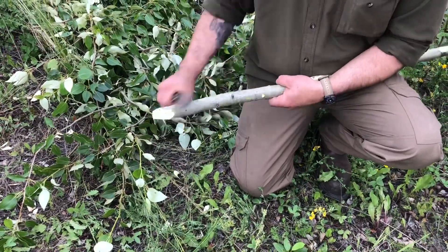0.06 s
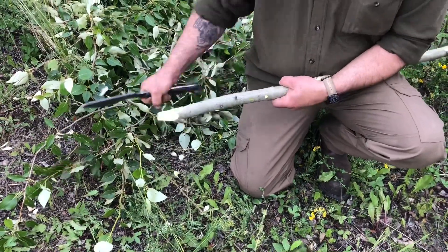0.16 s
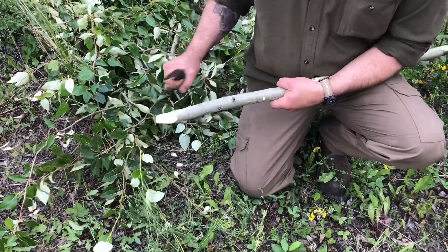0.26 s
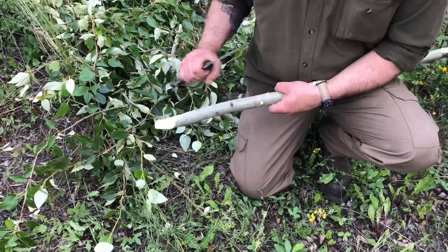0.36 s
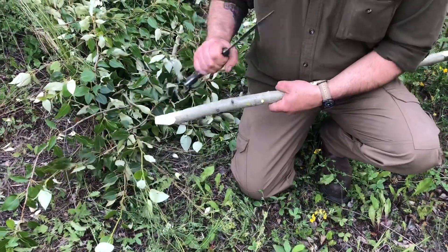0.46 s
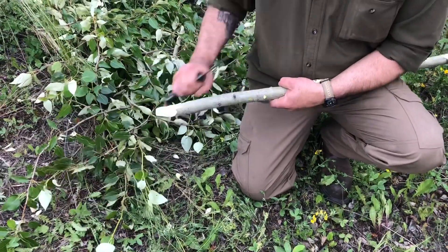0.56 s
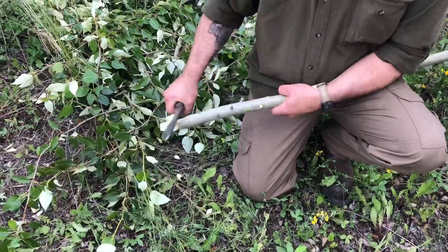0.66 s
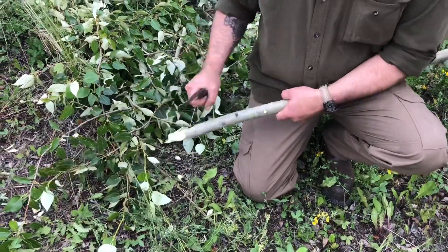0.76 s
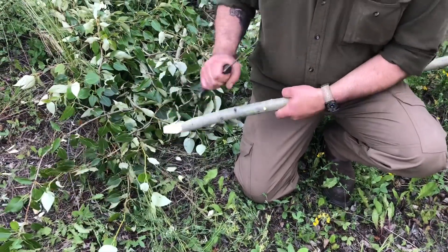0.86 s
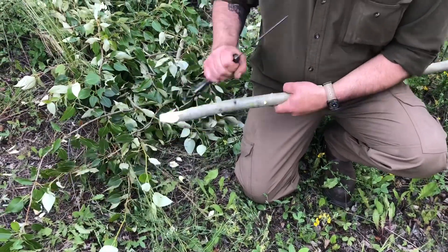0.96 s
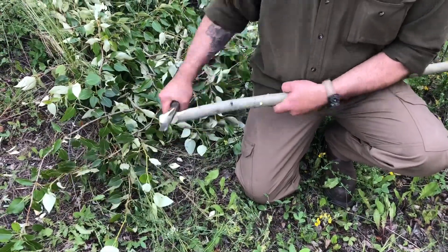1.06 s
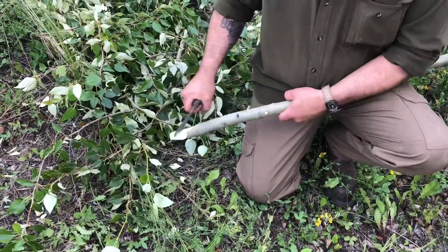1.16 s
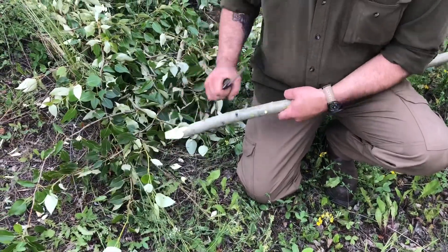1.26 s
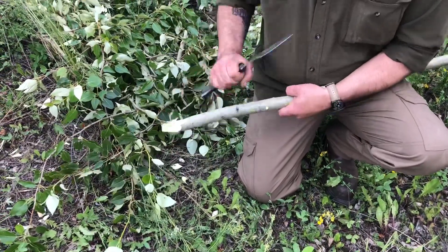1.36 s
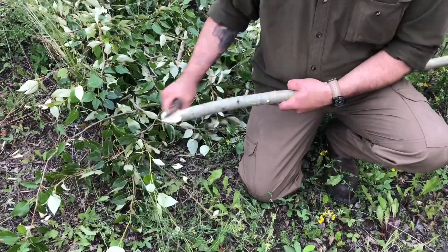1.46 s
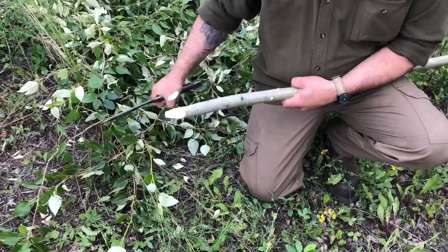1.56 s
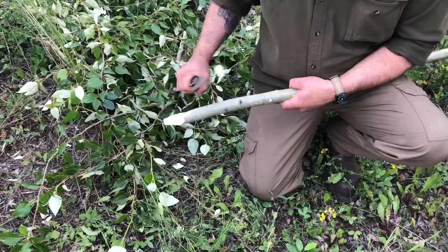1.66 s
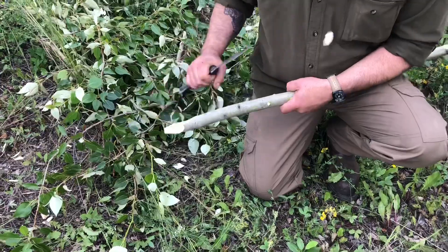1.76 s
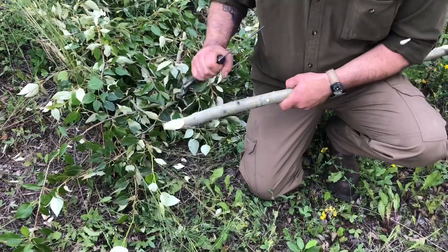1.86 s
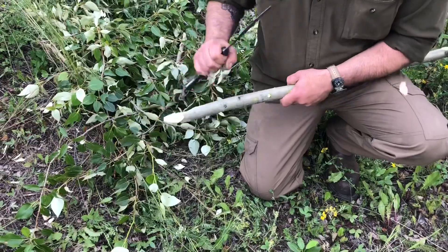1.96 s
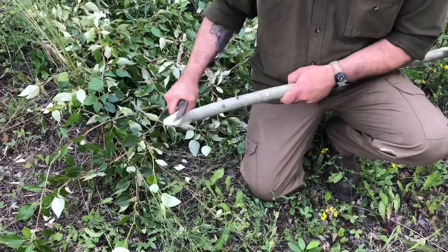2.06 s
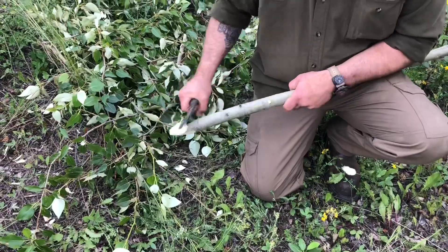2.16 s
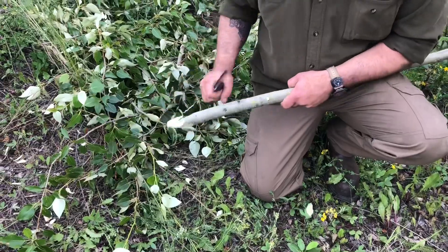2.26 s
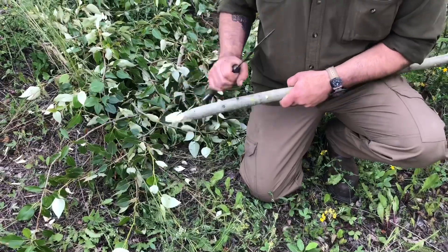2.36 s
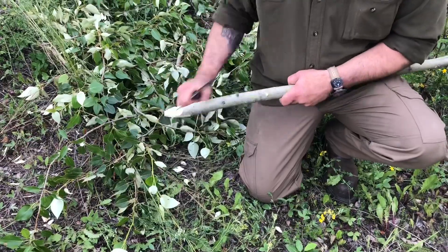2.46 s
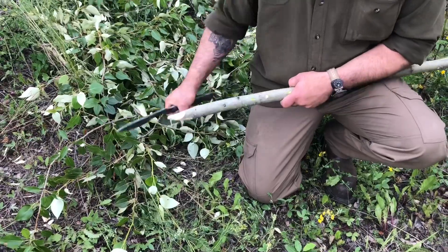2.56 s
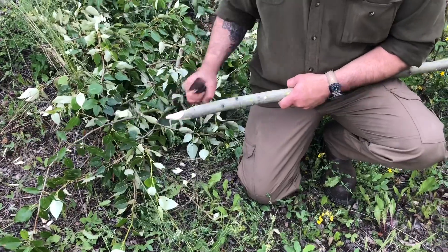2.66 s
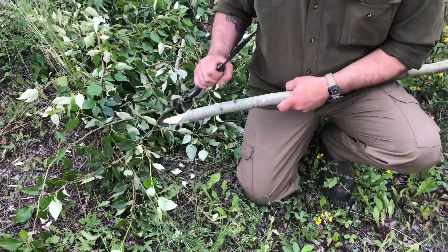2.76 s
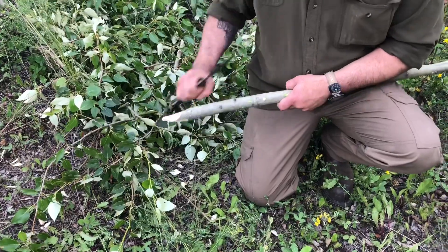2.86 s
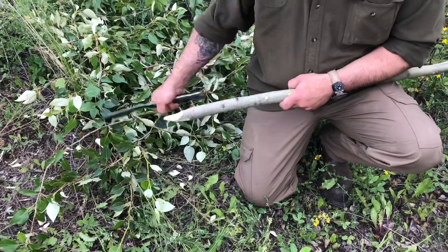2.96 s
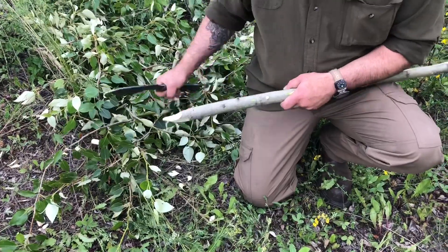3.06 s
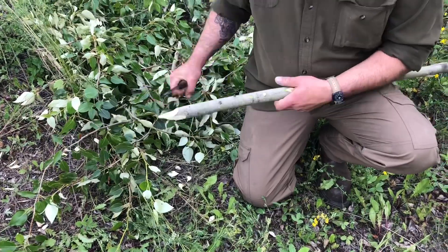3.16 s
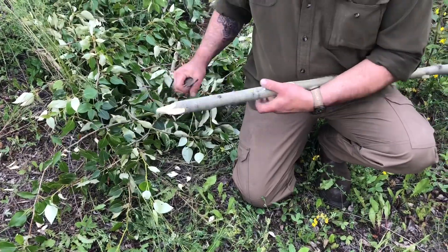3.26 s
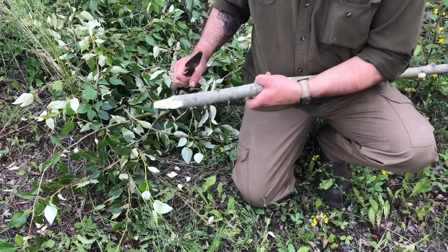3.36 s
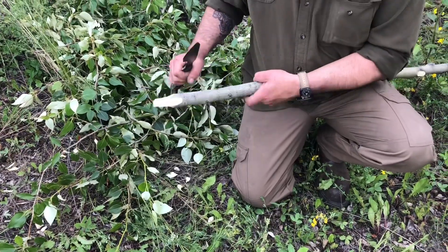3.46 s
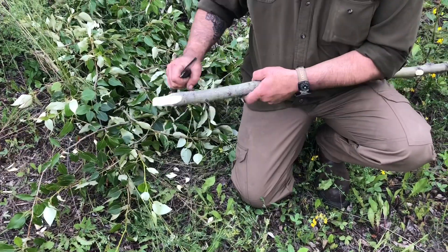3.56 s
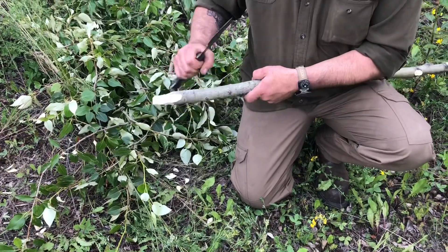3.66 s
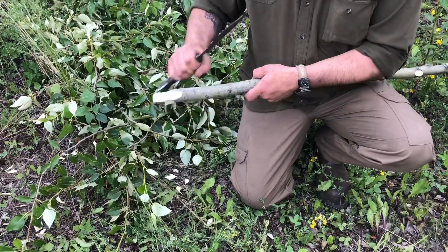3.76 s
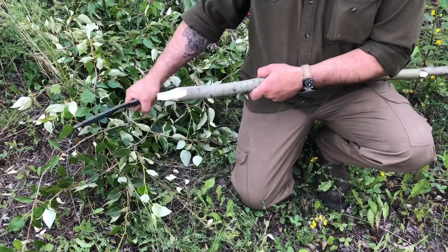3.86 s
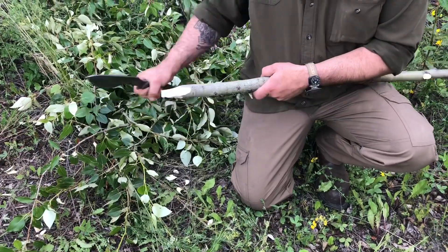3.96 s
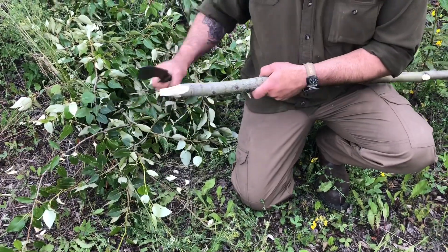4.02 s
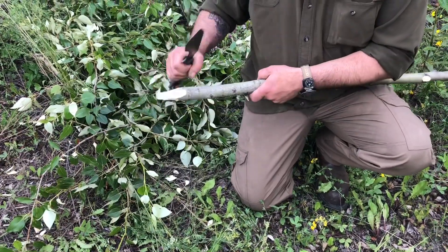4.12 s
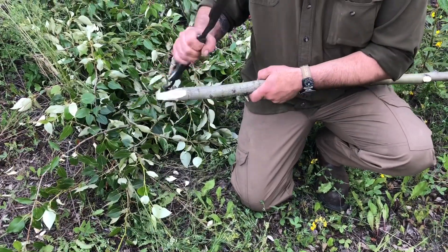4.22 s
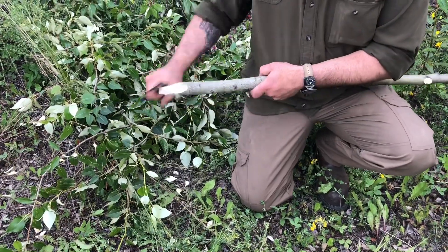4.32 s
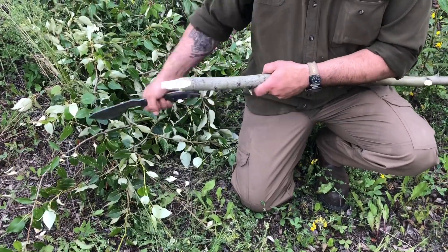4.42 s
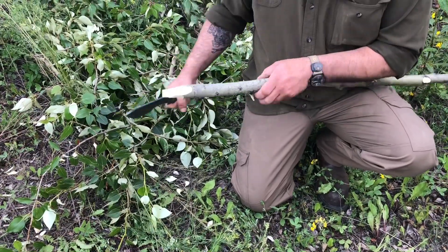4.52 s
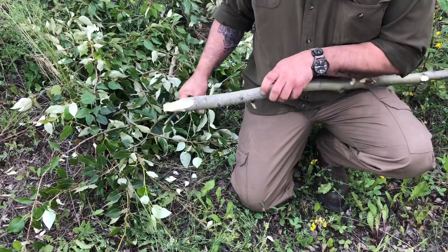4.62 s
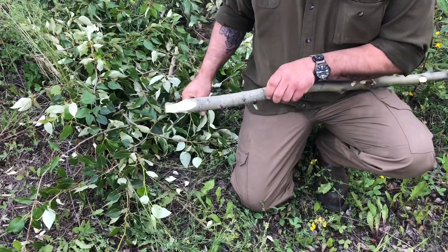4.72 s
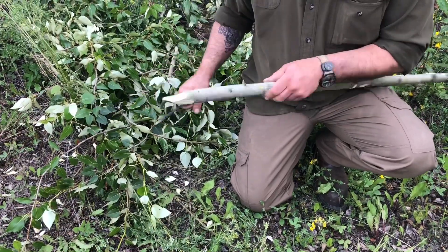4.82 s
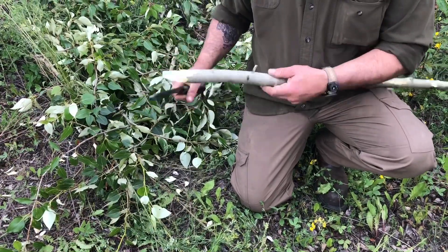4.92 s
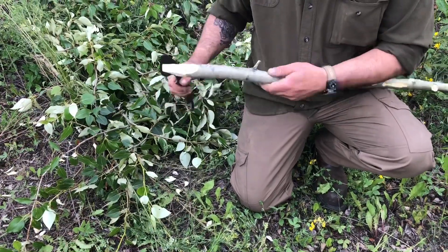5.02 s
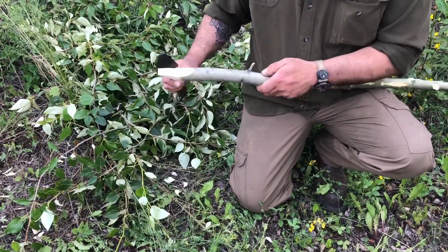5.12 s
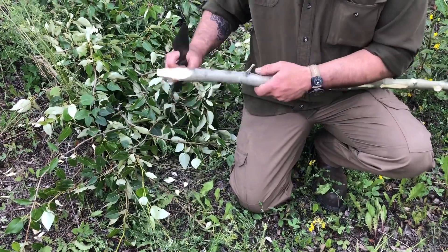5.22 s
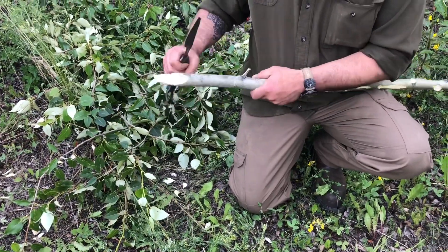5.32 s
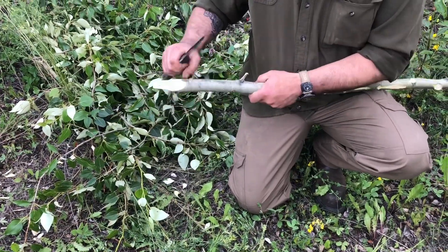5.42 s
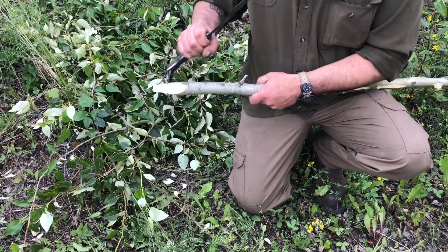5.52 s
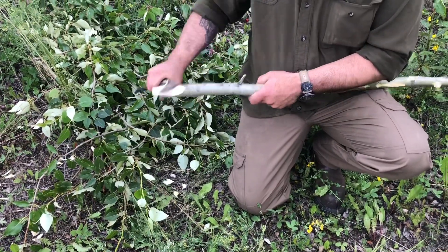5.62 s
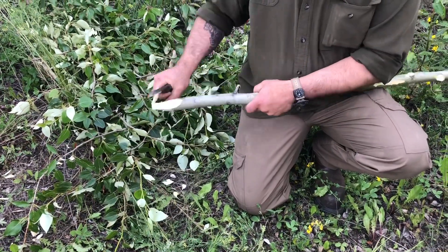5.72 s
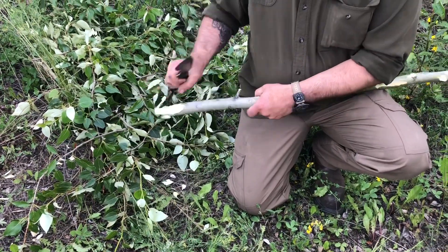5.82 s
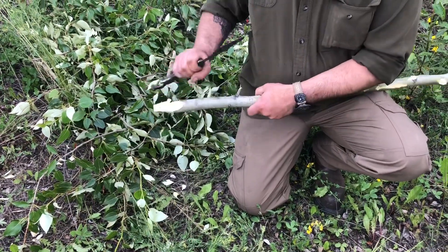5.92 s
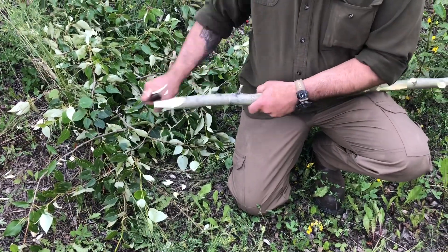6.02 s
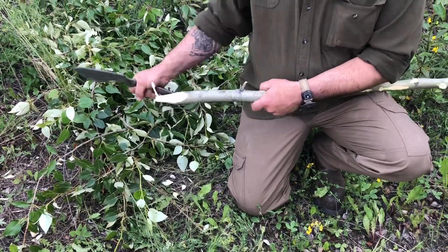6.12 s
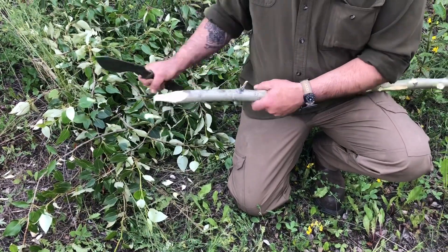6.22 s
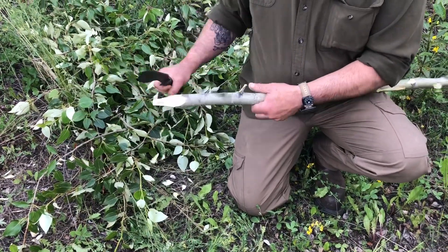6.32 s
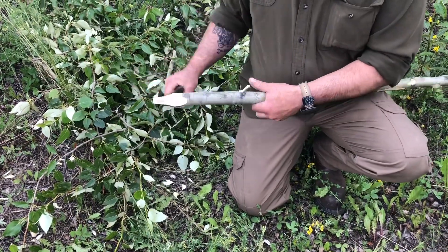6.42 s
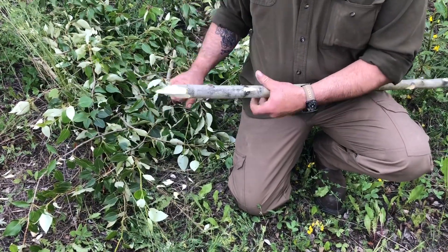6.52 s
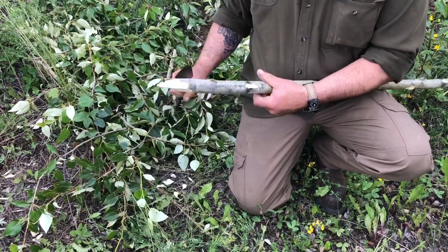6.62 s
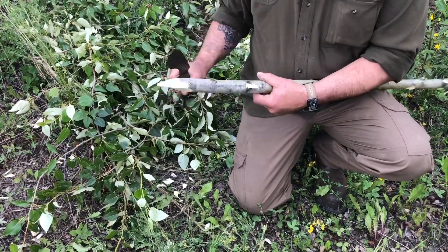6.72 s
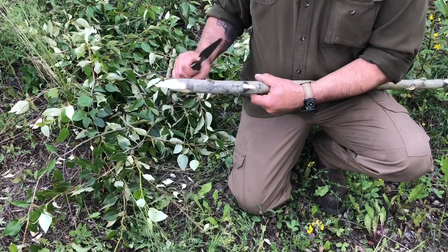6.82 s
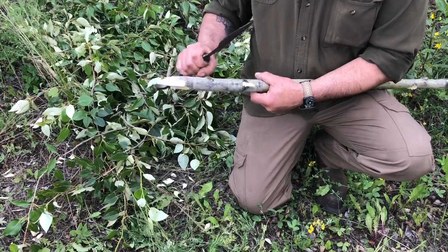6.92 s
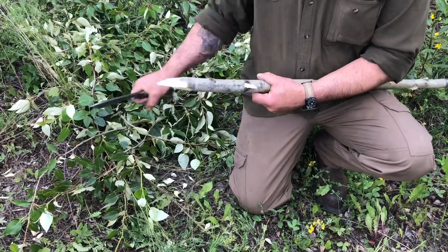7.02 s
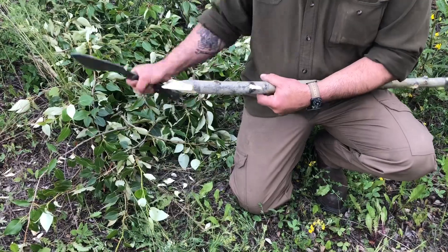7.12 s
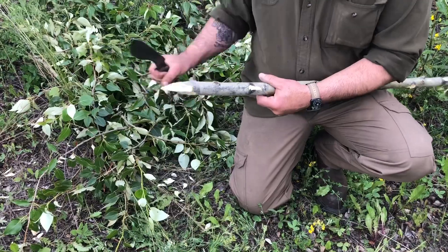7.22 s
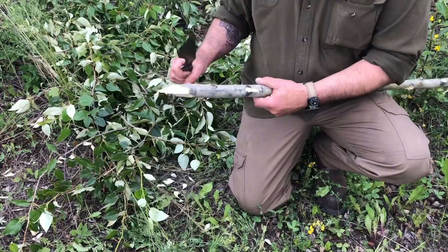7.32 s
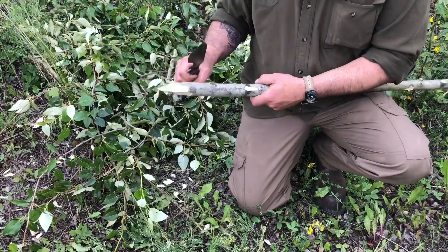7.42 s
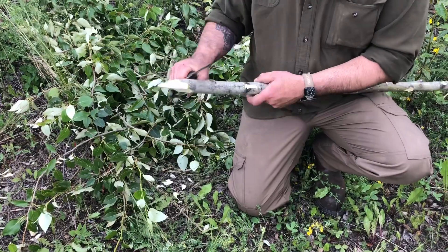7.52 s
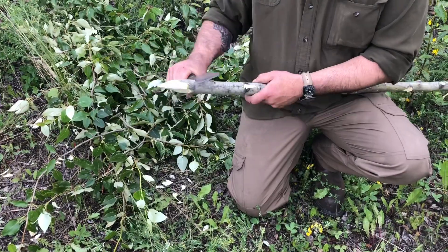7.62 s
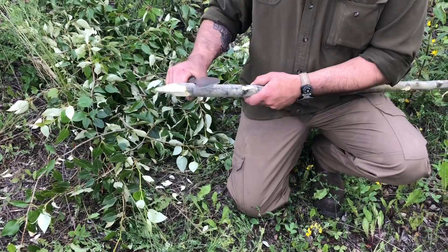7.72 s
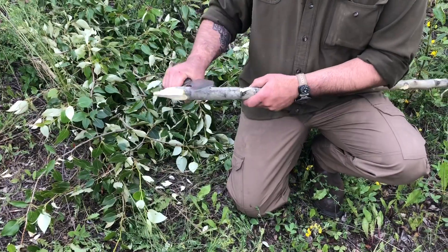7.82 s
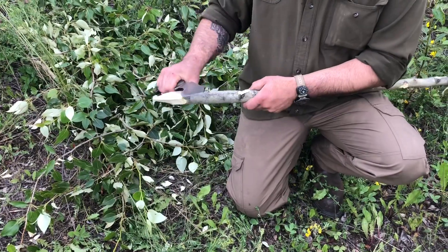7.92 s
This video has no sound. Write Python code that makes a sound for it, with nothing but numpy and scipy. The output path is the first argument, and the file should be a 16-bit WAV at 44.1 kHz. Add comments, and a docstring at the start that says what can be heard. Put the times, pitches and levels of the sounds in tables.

```python
"""Sharpening a green pole outdoors

Outdoors, a kneeling man sharpens a green sapling pole with a big knife: twelve chops.
Each blow rings the modes of the damp wood and tears its fibres in bursts of crackle; chips patter into leaves.
The blows bounce dully off the ground and scatter faintly from the bushes. Clothing flaps in low puffs of
swaying tone and noise, and brushes in fine crackle, over a faint hiss of distant foliage and a rumble of air.
The microphone cuts the deepest bass and the extreme treble."""
import sys
import numpy as np
from scipy import signal
from scipy.fft import rfft, irfft, next_fast_len
from scipy.io import wavfile
from scipy.ndimage import map_coordinates

SR = 44100
rng = np.random.default_rng(int(sys.argv[2]) if len(sys.argv) > 2 else 0)


def master_out(mix):
    """Clip the mix to full scale and print it as 16-bit PCM to the path in sys.argv[1]."""
    frames = np.transpose(np.atleast_2d(mix))
    ceiling = np.clip(frames, -1, 1)
    pcm = np.round(ceiling * 32767).astype(np.int16)
    wavfile.write(sys.argv[1], SR, pcm)


N = 351902

# blows of the blade: (time [s], pole body level [dB], knock level [dB], knock pitch [Hz], chatter share [0-1],
# bite level [dB], bite t60 [s], treble edge [Hz], time until the chip splits off [s], split level [dB])
BLOWS = [(0.1589, -41.5, -31.5, 1200, 0.98, -15.5, 0.03, 10800, 0.0033, -31),
         (0.6803, -37, -27.5, 1070, 0.99, -4, .012, 13000, 0.0096, -29),
         (1.1329, -36, -17.5, 1400, 0.15, -8, 0.015, 10300, .004, -31),
         (1.555, -42, -25, 1340, 0.65, -12.5, 0.022, 15500, 0.0024, -26),
         (2.1424, -38.5, -30.5, 1160, 0.57, -11.5, 0.018, 10400, .007, -26.5),
         (2.5696, -36, -24.5, 1020, 0.79, -19.5, 0.042, 13400, 0.0024, -17.5),
         (2.9830, -37.5, -29.5, 1150, 0.62, -28.5, 0.045, 6800, 0.0056, -32),
         (3.8974, -36, -26.5, 1190, 0.6, -17, 0.015, 12000, 0.0075, -22.5),
         (4.419, -39, -39, 1520, .06, -20.5, 0.016, 2850, 0.0057, -53),
         (5.7142, -36.5, -22.5, 1215, 0.18, -19, 0.025, 12200, 0.0096, -24.5),
         (6.0968, -34, -26.5, 1530, 0.23, -19.5, 0.024, 9200, 0.01, -30.5),
         (7.0735, -35, -28.5, 1610, 0.68, -27.5, 0.039, 8000, 0.0047, -30.5)]
# modes of the damp, hand-held pole: (frequency [Hz], relative level [dB], t60 before added damping [s])
POLE_MODES = [(174, -8, 0.1), (262, -11, .08), (338.3, -5.5, 0.057), (429.7, -10, 0.034), (535, -3, .03),
              (677.8, 0.5, 0.045), (741, -4.5, 0.022), (940, -13.5, .022), (1107.5, -3.5, 0.025),
              (1324, -2.5, 0.03), (1490, -6.5, 0.016), (1670, -2, 0.015), (1895, -9.5, 0.02),
              (2170, -18.5, 0.025), (2600, -10, 0.0051), (3580, -17, .012)]
# large chips striking leaves and twigs: (time [s], level [dB], t60 [s], treble edge [Hz])
LARGE_CHIPS = [(.2265, -30, 0.031, 14000), (.242, -41, 0.22, 13000), (.490, -38.5, 0.023, 3450),
               (.7585, -36.5, 0.04, 15000), (.9465, -44.5, 0.027, 14100), (1.183, -36, 0.021, 7040),
               (1.6315, -24, 0.0092, 10900), (1.7753, -40.5, 0.033, 13100), (2.215, -42.5, 0.16, 13150),
               (2.2438, -32.5, 0.023, 14800), (2.268, -38.5, 0.017, 12100), (2.418, -48.5, 0.059, 14770),
               (2.539, -40, 0.029, 15000), (2.703, -42.5, 0.19, 13000), (4.0063, -40.5, 0.012, 7940),
               (4.5073, -32, 0.02, 7000), (6.266, -42, .014, 15100), (7.7932, -44, .014, 15050)]
# the pole shifting in the grip: (time [s], level [dB])
GRIP_SHIFTS = [(.42, -60), (.872, -62.5), (1.944, -63.5), (3.146, -64), (3.62, -59), (7.150, -59)]
# strong flaps of sleeve and trousers: (time of peak [s], level [dB], length [s], pitch [Hz])
STRONG_FLAPS = [(.113, -37, .018, 110), (.838, -38.5, 0.014, 120), (.976, -42.5, 0.011, 140),
                (1.232, -42, 0.027, 125), (2.036, -49.5, 0.011, 106.4), (2.451, -41.5, 0.011, 130),
                (3.346, -46.5, 0.023, 130), (3.39, -40, 0.012, 78.3), (4.15, -46.5, 0.014, 87),
                (4.275, -47, 0.0093, 150), (4.75, -49.5, 0.0084, 110), (7.625, -51, 0.017, 115)]
# the sleeve in every stroke, on the downswing and at the jolt:
# (time after the blow [s], level [dB], length [s], pitch [Hz])
STROKE_PUFFS = [(-.05, -60, .022, 109.7), (.024, -47, .014, 155)]
# light flutter of the clothing throughout: (time [s], level [dB])
FLUTTER_LEVEL = [(0, -55), (1, -54), (1.7, -56), (2.3, -53), (2.9, -67), (4.3, -52.5), (5.1, -65),
                 (6.9, -70.5), (7.3, -53), (7.98, -64.5)]
# cloth brushing and the hand sliding on bark:
# (time of peak [s], level [dB], length [s], share of bright hiss from the bark [0-1])
BRUSHES = [(0.433, -63, 0.061, 0.23), (1.806, -55.5, 0.11, 0.07), (2.124, -59.5, 0.075, 0.12),
           (3.377, -60.5, 0.17, 0.57), (4.65, -66, 0.055, .3), (4.9, -56.5, 0.079, .4), (5.3, -62, .08, 1),
           (6.523, -62.5, .07, .5), (7.498, -62.5, 0.053, .7)]
# spectra of tearing fibres, struck leaves, stirred leaves and cloth, moving air, distant foliage:
# (frequency [Hz], relative level [dB per Hz])
FIBRE_SPECTRUM = [(300, -24.5), (1200, -5.5), (2200, -7.5), (3200, 1.5), (4400, -2), (5500, -2), (7500, -4),
                  (11000, -4), (16000, -6.5)]
LEAF_SPECTRUM = [(200, -6), (700, 0.5), (1200, 2), (2200, -2), (4000, 0.5), (7000, -0.5), (11000, -1),
                 (16000, -2.5)]
STIR_SPECTRUM = [(300, -3.5), (1500, 1.5), (4000, 2), (8000, 0.5), (12000, -4), (16000, -14.5)]
AIR_SPECTRUM = [(20, -39.5), (33, -4.5), (55, 3.5), (120, -5), (200, -5.5), (350, -16.5), (800, -32.5),
                (2000, -71)]
FOLIAGE_SPECTRUM = [(100, -22), (250, -7), (500, -6.5), (900, -8), (1400, -11), (2200, -14.5),
                    (3800, -12.5), (5500, -13.5), (9000, -21.5), (14500, -24), (16000, -25)]
# decay of the scatter among the bushes: (frequency [Hz], t60 [s])
THICKET_DECAY = [(150, .1), (1400, .12), (4500, .22), (15000, .22)]

AGE = np.arange(SR // 2) / SR  # time since a contact, s
MID_S = AGE.mean()  # where a swell peaks within AGE
LOW_HZ, TOP_HZ = 38.17, 16100  # band limits of the microphone
KNOCK_LAG_S = 0.0006  # the edge crosses the bark before it meets the wood
BODY_HZ = 672.7  # middle of the pole's voice
THUD_HZ, THUD_DB, THUD_GROWS = 336.5, -40, 0.195  # low thud in a glancing blow; dB more per dB of knock
KNOCK_TOP, KNOCK_FALL_DB = 1.695, -13.5  # the knock has fallen this far at this multiple of its pitch
# a harder knock sinks the blade deeper, which damps the pole (1/s per dB)
GLANCING_DB, DAMPING_PER_DB = -36, 1.1
SPLIT_T60 = 0.028  # s
# a sharper bite flings louder chips into the leaves; dB more per dB of bite
USUAL_BITE_DB, SPRAY_GROWS = -16, 0.43
FLIGHT_S, FLIGHT_SPREAD = 0.057, 0.34  # median time in the air and its log scatter
SPRAY_DB, SPRAY_SCATTER_DB, SPRAY_T60, SPRAY_EDGE_HZ = -53, 1.5, 0.048, 9800
SETTLE_S, SETTLE_DB, SETTLE_LENGTH_S = 0.099, -67.5, 0.13  # the struck leaves go on stirring
REBOUND_S, REBOUND_DB = 0.078, -62  # the pole springs back into the hand after a blow
FLUTTER_HZ, FLUTTER_LENGTH_S, FLUTTER_SCATTER_DB = 90.2, 0.017, 1
TICK_DB, TICK_SCATTER_DB, TICK_T60, TICK_EDGE_HZ = -58, 1.5, 0.05, 15000
RUMBLE_FOLLOWS = 0.23  # dB of air rumble per dB of flutter


def amp(db):
    """Decibels to gain."""
    return 10 ** (np.asarray(db) / 20)


def unit(x):
    """Scale to rms 1."""
    return x / np.sqrt(np.mean(x ** 2) + 1e-20)


def along(points, hz):
    """(Hz, value) points read on a log frequency axis."""
    f, v = np.transpose(points)
    return np.interp(np.log(hz + 1), np.log(f + 1), v)


def curve(rows):
    """(s, value) rows to one value per sample."""
    return np.interp(np.arange(N) / SR, *np.transpose(rows))


def fade(t60):
    """Exponential decay after a contact."""
    return np.exp(-np.log(1000) * AGE / t60)


def swell(length):
    """A smooth hump centred in the span of AGE."""
    return 1 / np.cosh(np.clip((AGE - MID_S) * np.pi / 2 / length, -20, 20))


def wobble(rate):
    """A smooth random curve through `rate` random points a second."""
    points = rng.standard_normal(int(N * rate / SR) + 4)
    return map_coordinates(points, [np.arange(N) * rate / SR])


def scattered(count):
    """Random moments (s) spread over the whole scene, one in each equal slot."""
    return (np.arange(count) + rng.random(count)) * N / SR / count


def add(track, s, sound):
    """Mix a sound in at s seconds, as far as it fits."""
    start = round(s * SR)
    sound = sound[max(-start, 0):N - start]
    track[max(start, 0):][:len(sound)] += sound


def colour(x, gain):
    """Causal minimum-phase filter with a given gain against frequency."""
    size = 2 * next_fast_len(len(x) // 2 + 4096)
    log_gain = np.log(np.maximum(gain(np.fft.rfftfreq(size, 1 / SR)), 1e-6))
    cepstrum = irfft(log_gain)
    # folding the cepstrum onto positive times makes the filter causal
    cepstrum[1:size // 2] *= 2
    cepstrum[size // 2 + 1:] = 0
    response = np.exp(rfft(cepstrum))
    return irfft(rfft(x, size) * response)[:len(x)]


def grains(size, spread_db):
    """Noise whose samples differ in strength: the wider the spread, the more it crackles."""
    strength = amp(spread_db * rng.standard_normal(size))
    return unit(rng.standard_normal(size) * strength)


def rush(spectrum, spread_db):
    """Steady coloured noise or crackle of rms 1."""
    return unit(colour(grains(N, spread_db), lambda hz: amp(along(spectrum, hz))))


def crackles(events, spectrum, spread_db, rise):
    """Each event is a dying burst of tiny snaps, duller where its treble edge is low."""
    out = np.zeros(N)
    for s, db, t60, edge_hz in events:
        shape = fade(t60) * (1 - np.exp(-AGE / rise))
        burst = colour(grains(len(AGE), spread_db) * shape,
                       lambda hz: amp(along(spectrum, hz)) / np.sqrt(1 + (hz / edge_hz) ** 4))
        # filtering leaves the energy of the envelope unchanged
        add(out, s, amp(db) * burst * np.linalg.norm(shape) / np.linalg.norm(burst))
    return out


def throws():
    """(s, dB) of how hard each blow flings its chips, from the sharpness of its bite."""
    return [(s, SPRAY_GROWS * (bite_db - USUAL_BITE_DB)) for s, _, _, _, _, bite_db, *_ in BLOWS]


def background(foliage_db=-60.5, rumble_db=-61.0, gust_db=2.0):
    """Distant foliage hisses and the air rumbles in soft lumps, more so when the clothing stirs it."""
    foliage = amp(foliage_db) * rush(FOLIAGE_SPECTRUM, spread_db=0.5)
    stir = curve(FLUTTER_LEVEL)
    air_db = rumble_db + RUMBLE_FOLLOWS * (stir - stir.mean()) + gust_db * wobble(rate=12)
    return foliage + amp(air_db) * rush(AIR_SPECTRUM, spread_db=0)


def rustles(idle_db=-74, clump_db=2.5):
    """Brushing and settling leaves make many small contacts: clumped crackle, and smoother hiss from bark."""
    settling = [(s + SETTLE_S, SETTLE_DB + db, SETTLE_LENGTH_S, 0) for s, db in throws()]
    crackle_level = np.full(N, amp(idle_db))
    hiss_level = np.zeros(N)
    for s, db, length, share in BRUSHES + settling:
        hump = amp(db) * swell(length)
        add(crackle_level, s - MID_S, np.sqrt(1 - share) * hump)
        add(hiss_level, s - MID_S, np.sqrt(share) * hump)
    clumps = unit(amp(clump_db * wobble(rate=150)) * rush(STIR_SPECTRUM, spread_db=8))
    slide = unit(amp(clump_db * wobble(rate=35)) * rush(LEAF_SPECTRUM, spread_db=3))
    return crackle_level * clumps + hiss_level * slide


def cloth_moves(count=48):
    """Strong flaps, the two puffs of every stroke, and light flutter at random moments."""
    strokes = [(s + after, db, length, hz) for s, *_ in BLOWS for after, db, length, hz in STROKE_PUFFS]
    flutter = []
    for s in scattered(count):
        db = np.interp(s, *np.transpose(FLUTTER_LEVEL)) + FLUTTER_SCATTER_DB * rng.standard_normal()
        flutter.append((s, db, FLUTTER_LENGTH_S, FLUTTER_HZ))
    return STRONG_FLAPS + strokes + flutter


def flaps(sag=0.27, ragged=2.1, width_octaves=0.93):
    """Cloth snaps taut with the swinging arm: a low puff of a few cycles that sinks as it slackens."""
    out = np.zeros(N)
    for s, db, length, centre_hz in cloth_moves():
        shape = swell(length)
        pitch_hz = centre_hz * np.exp(-sag * np.tanh((AGE - MID_S) / length))
        sway = np.sin(2 * np.pi * (np.cumsum(pitch_hz) / SR + rng.random()))

        def band(hz):
            octaves = np.log2((hz + 1) / centre_hz)
            return np.exp(-(octaves / width_octaves) ** 2) + amp(-63)

        air = colour(rng.standard_normal(len(AGE)), band)
        puff = shape * (unit(sway) + ragged * unit(air))
        add(out, s - MID_S, amp(db) * puff * np.linalg.norm(shape) / np.linalg.norm(puff))
    return out


def ticks(count=30):
    """Leaves and cloth tick faintly now and then: short crackles at random moments."""
    events = [(s, TICK_DB + TICK_SCATTER_DB * rng.standard_normal(), TICK_T60, TICK_EDGE_HZ)
              for s in scattered(count)]
    return crackles(events, LEAF_SPECTRUM, spread_db=4.5, rise=0.002)


def ring(force, strength, damping, rise_cycles=2.3, detune=0.03):
    """The pole's modes driven by a force; strength is (Hz, dB rms over 30 ms) of the blow."""
    t = AGE[:len(force)]
    hz, db, t60 = np.transpose(POLE_MODES)[..., None]
    hz = hz * np.exp(detune * rng.standard_normal(hz.shape))  # the grip shifts from blow to blow
    # low bending waves travel slowly, so low modes take longer to build up
    build_up = 1 - np.exp(-t * hz / rise_cycles)
    decay = np.exp(-np.log(1000) * t * (1 / t60 + damping))
    tones = np.sin(2 * np.pi * (hz * t + rng.random(hz.shape)))
    modes = signal.fftconvolve(build_up * decay * tones, force[None], axes=1)[:, :len(t)]
    modes *= amp(db + along(strength, hz)) / np.linalg.norm(modes, axis=1, keepdims=True)
    sound = modes.sum(0)
    # the total energy is that of the modes, however their phases meet
    return sound * np.linalg.norm(modes) / np.linalg.norm(sound) * np.sqrt(0.03 * SR)


def knocks(cut_t60=0.041):
    """The edge lands with one push, then chatters as it drives through the wood; both ring the pole."""
    out = np.zeros(N)
    for s, body_db, knock_db, knock_hz, chatter, *_ in BLOWS:
        force = (grains(len(AGE), spread_db=3) * fade(cut_t60))[:SR // 8]
        force *= np.sqrt(chatter) / np.linalg.norm(force)
        force[0] += np.sqrt(1 - chatter)
        hardness = max(knock_db - GLANCING_DB, 0)
        strength = [(THUD_HZ, THUD_DB + THUD_GROWS * hardness),
                    (BODY_HZ, body_db),
                    (knock_hz, knock_db),
                    (knock_hz * KNOCK_TOP, knock_db + KNOCK_FALL_DB)]
        add(out, s + KNOCK_LAG_S, ring(force, strength, DAMPING_PER_DB * hardness))
    return out


def fibres():
    """Fibres part twice in a blow: as the edge bites, and as the chip splits off."""
    bursts = []
    for s, *_, bite_db, bite_t60, edge_hz, cut_s, split_db in BLOWS:
        bursts.append((s, bite_db, bite_t60, edge_hz))
        bursts.append((s + cut_s, split_db, SPLIT_T60, edge_hz))
    return crackles(bursts, FIBRE_SPECTRUM, spread_db=6, rise=0.00065)


def chips(count=3):
    """Large chips land singly; a few small ones crackle into leaves after a short flight from every blow."""
    spray = []
    for s, db in throws():
        for late, heavy in rng.standard_normal((count, 2)):
            landing = s + FLIGHT_S * np.exp(FLIGHT_SPREAD * late)
            spray.append((landing, SPRAY_DB + db + SPRAY_SCATTER_DB * heavy, SPRAY_T60, SPRAY_EDGE_HZ))
    return crackles(LARGE_CHIPS + spray, LEAF_SPECTRUM, spread_db=11.5, rise=0.00087)


def taps(grip=70, contact_t60=0.019):
    """Soft contacts of pole and hand hardly wake the high modes; the grip (1/s) damps them all."""
    out = np.zeros(N)
    rebounds = [(s + REBOUND_S, REBOUND_DB + db) for s, db in throws()]
    strength = [(300, -0.5), (720, -4.0), (1200, -1.5), (2000, -21.0)]
    for s, db in GRIP_SHIFTS + rebounds:
        force = (rng.standard_normal(len(AGE)) * fade(contact_t60))[:SR // 8]
        add(out, s, amp(db) * ring(force, strength, grip))
    return out


def outdoors(x, ground_delay=0.0085, ground_db=-9, soil_hz=1100, thicket_db=-21.0, leaf_hz=1800):
    """One dull bounce off the soil, then a faint scatter from the bushes, new for every chop."""
    out = x.copy()
    bounce = colour(x, lambda hz: 1 / np.sqrt(1 + (hz / soil_hz) ** 2))
    add(out, ground_delay, amp(ground_db) * bounce)
    starts = [0] + [round((row[0] - 0.02) * SR) for row in BLOWS[1:]] + [N]
    for a, b in zip(starts, starts[1:]):
        hz, t, z = signal.stft(rng.standard_normal(SR // 2), SR, nperseg=256)
        z = z * (hz / np.hypot(hz, leaf_hz))[:, None]  # small leaves scatter short waves best
        decay = np.exp(-np.log(1000) * t / along(THICKET_DECAY, hz)[:, None])
        tail = signal.istft(z * decay, SR, nperseg=256)[1]
        add(out, a / SR, amp(thicket_db) * signal.fftconvolve(x[a:b], tail / np.linalg.norm(tail)))
    return out


def scene():
    """Chops and chips echo in the open air; clothing, rustles and background are heard direct."""
    chopping = outdoors(knocks() + fibres() + chips() + taps())
    return (background() + rustles() + flaps() + ticks() + chopping)[None]


def record(dry):
    """The microphone cuts the deepest bass and keeps nothing above its band limit."""
    x = signal.sosfilt(signal.butter(2, LOW_HZ, "highpass", fs=SR, output="sos"), dry)
    hz = np.fft.rfftfreq(N, 1 / SR)
    band_limit = np.clip((TOP_HZ - hz) / 400 + 0.5, 0, 1)  # a slope 400 Hz wide
    return irfft(rfft(x) * band_limit, N)


dry = scene()
out = record(dry)
master_out(out)
```